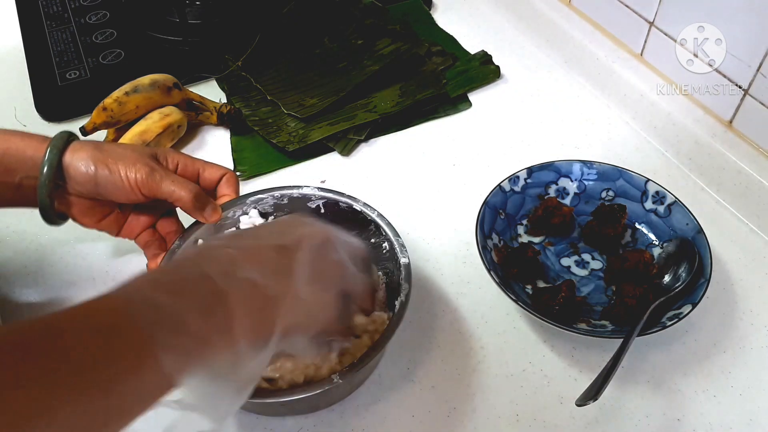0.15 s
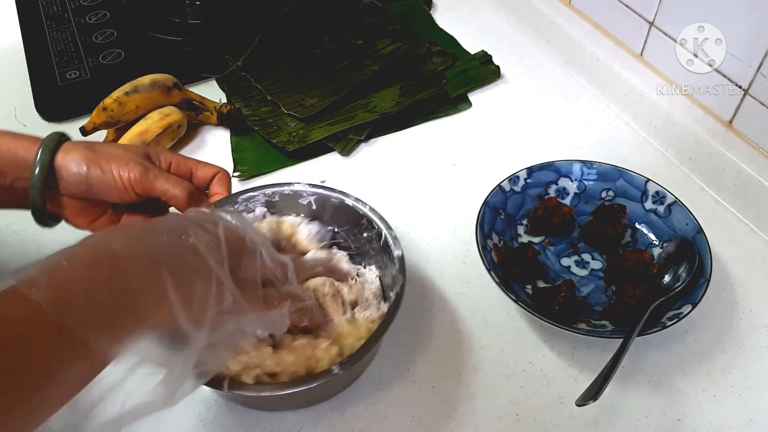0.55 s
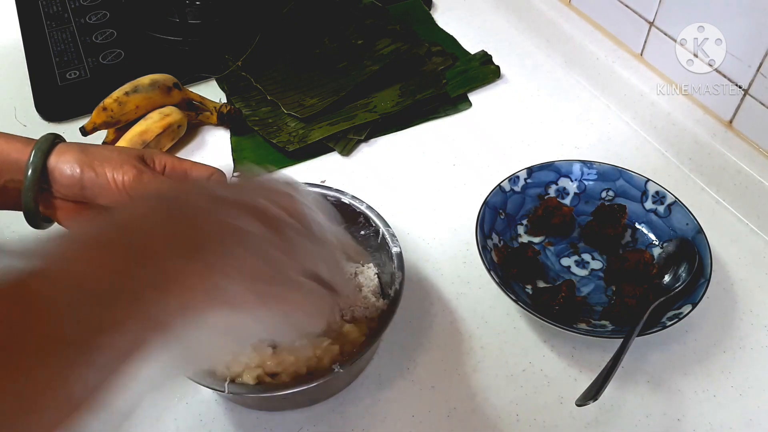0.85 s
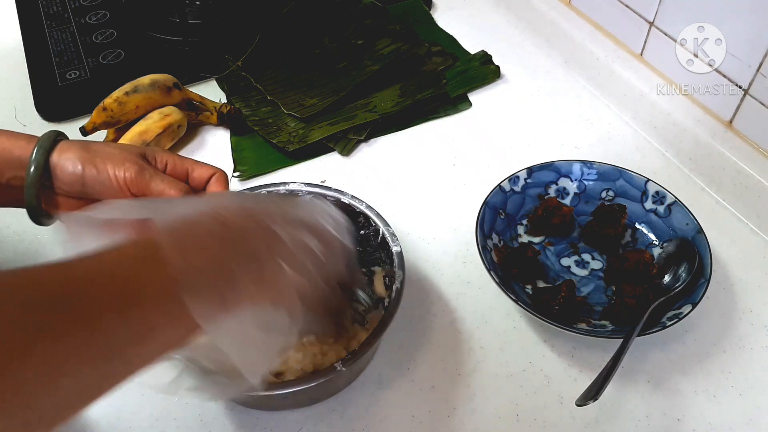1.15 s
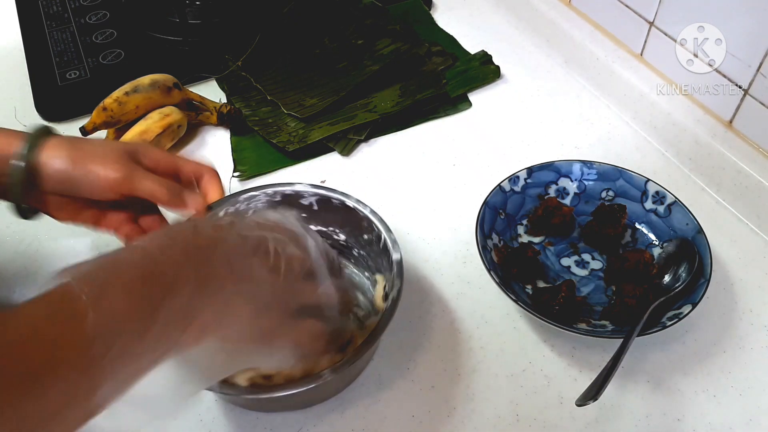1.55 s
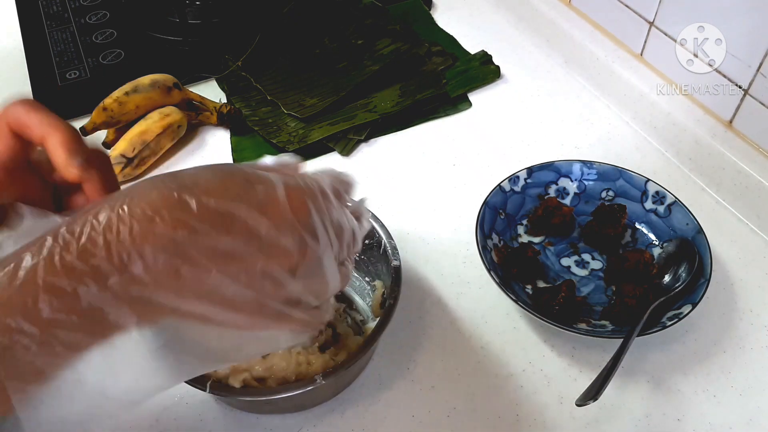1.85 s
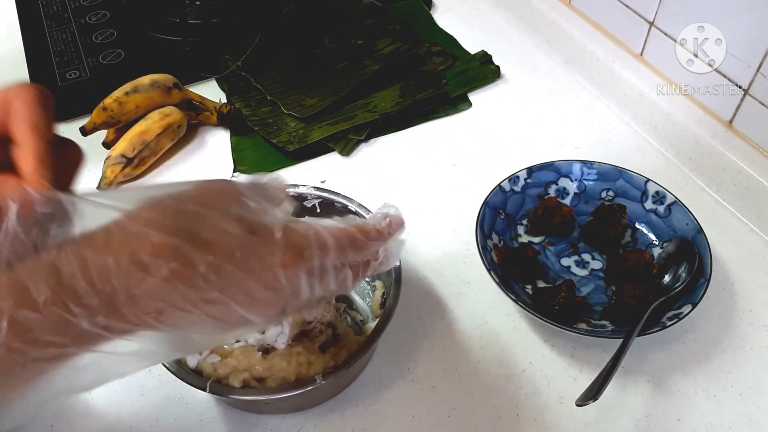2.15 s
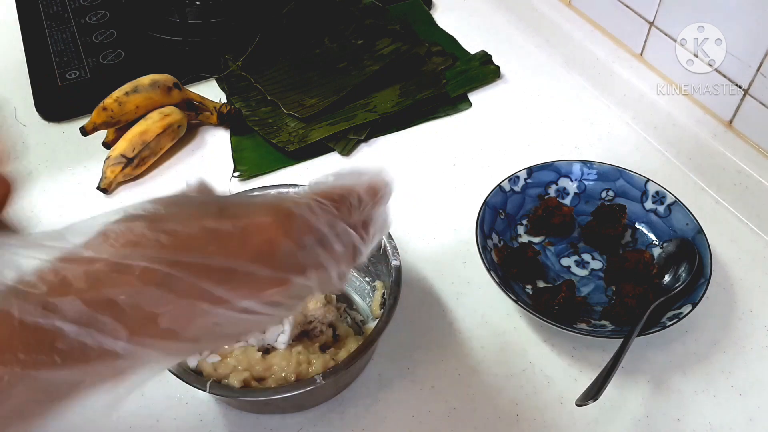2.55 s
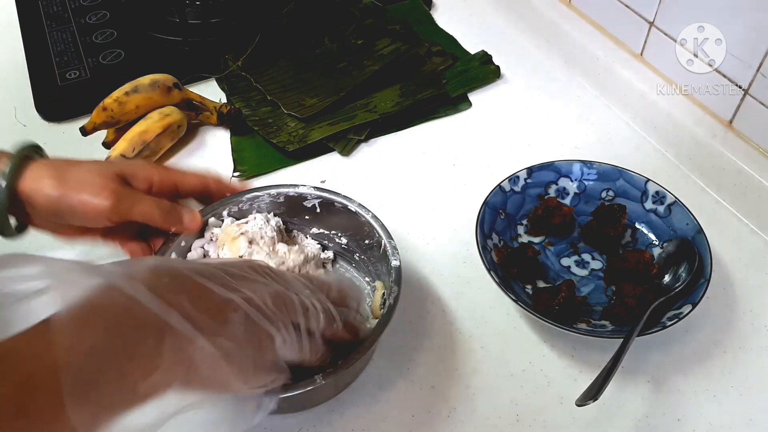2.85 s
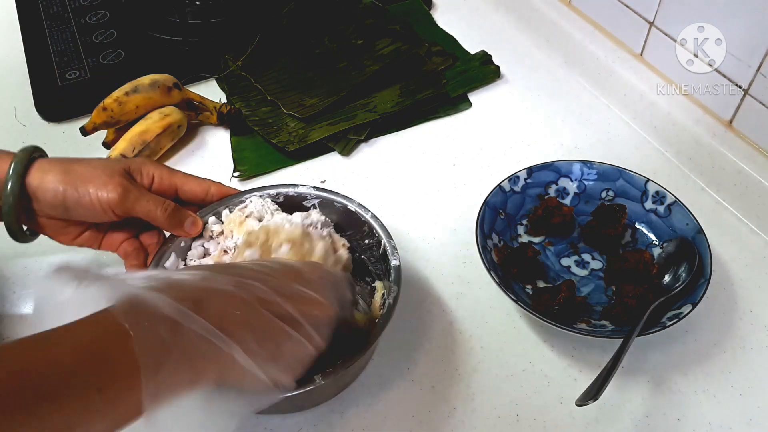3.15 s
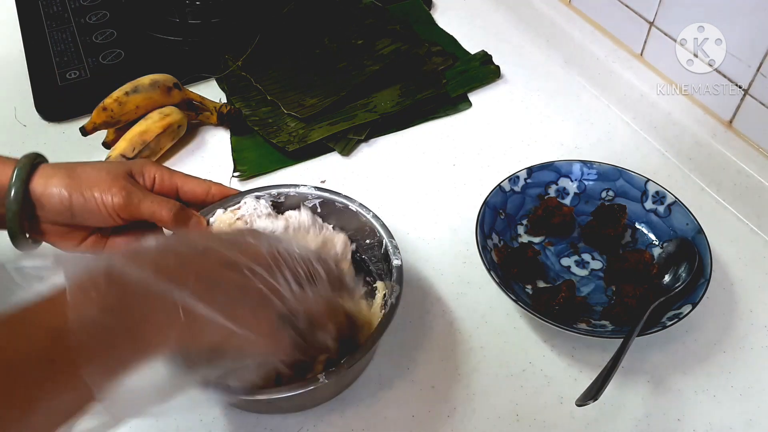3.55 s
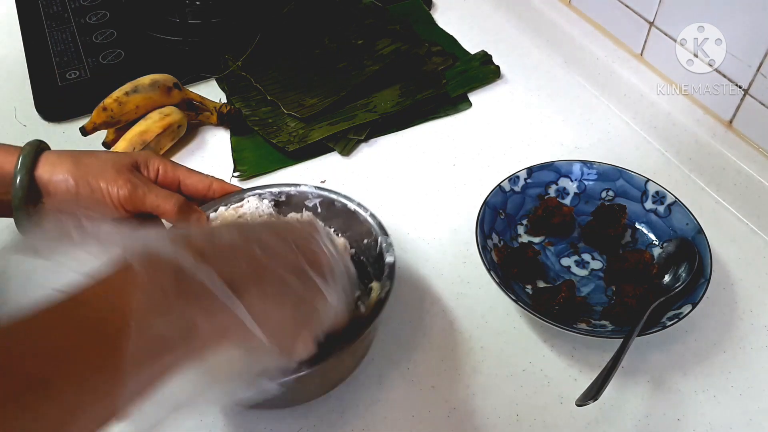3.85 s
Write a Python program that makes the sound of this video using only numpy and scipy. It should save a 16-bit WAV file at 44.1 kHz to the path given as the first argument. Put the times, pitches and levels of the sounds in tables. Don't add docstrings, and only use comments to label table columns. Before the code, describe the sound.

Gloved hand kneading soft wet food in a metal bowl, plastic crinkling, two loud late knocks

```python
import sys
import numpy as np
from scipy import signal
from scipy.fft import rfft, irfft
from scipy.io import wavfile

SR = 44100
rng = np.random.default_rng(int(sys.argv[2]) if len(sys.argv) > 2 else 0)


def generate_wav(sig):
    pcm = np.round(np.clip(np.atleast_2d(sig).T, -1, 1) * 32767).astype(np.int16)
    wavfile.write(sys.argv[1], SR, pcm)


def ratio_of_db(decibels):
    return 10 ** (np.asarray(decibels, float) / 20)


N = 176400
BASS_PAN_DB, RUSTLE_PAN_DB = -4.5, -1.4


def rms_one(x):
    return x / np.sqrt(np.mean(x ** 2) + 1e-20)


def colour(x, points):
    hz, db = np.transpose(points)
    f = np.maximum(np.arange(N // 2 + 1) * SR / N, 1)
    gain = ratio_of_db(np.interp(np.log(f), np.log(hz), db, left=-60))
    return rms_one(irfft(rfft(x) * gain, N))


def drift(rate_hz):
    step = 40
    r = np.exp(-2 * np.pi * rate_hz * step / SR)
    noise = rng.standard_normal(N // step + 2002)
    slow = signal.lfilter([1], [1, -2 * r, r * r], noise)[2000:]
    return np.interp(np.arange(N) / step, np.arange(len(slow)), rms_one(slow))


def grains(per_s, spread_db):
    sizes = ratio_of_db(spread_db * np.minimum(rng.exponential(1, (2, N)), 5))
    signs = rng.choice([-1, 1], (2, N))
    return sizes * signs * (rng.random((2, N)) < per_s / SR)


def ring(clicks, hz, t60_s):
    r, w = ratio_of_db(-60 / (t60_s * SR)), 2 * np.pi * hz / SR
    return signal.lfilter([0, np.sin(w)], [1, -2 * r * np.cos(w), r * r], clicks + 1e-18)


def strikes(times_s, gains):
    out = np.zeros(np.shape(gains)[:-1] + (N,))
    out[..., (np.asarray(times_s) * SR).astype(int)] = gains
    return out


def pan(x, db):
    left, right = x * ratio_of_db([[db / 2], [-db / 2]]) * np.ones((2, 1))
    return np.array([left, np.roll(right, 6)])


# frequency_hz [Hz], level_db [dB per Hz]
AIR_SPECTRUM = [(20, 4), (70, -20), (110, -6.5), (150, -9.5), (250, -21.5), (450, -21), (1000, -10.5),
                (3000, -74)]


def air():
    level_db = -48
    mid, side = rng.standard_normal((2, N))
    return pan(ratio_of_db(level_db) * colour(mid + 0.13 * side * [[1], [-1]], AIR_SPECTRUM), BASS_PAN_DB)


def low_pass(x, hz):
    return signal.lfilter(*signal.butter(1, hz, fs=SR), x)


def kitchen(x):
    first_echo_s, alike_below_hz, wall_cut_hz = 0.0035, 520, 1100
    bass_t60_s, treble_t60_s = 0.47, 0.28
    t = np.arange(SR // 2) / SR
    echoes = rng.standard_normal((3, len(t))) * np.clip(t / first_echo_s - 1, 0, 1)
    own, shared = echoes[:2], echoes[2]
    echoes = own - low_pass(own, alike_below_hz) + low_pass(shared, alike_below_hz)
    dull = low_pass(echoes, wall_cut_hz)
    bright = echoes - dull
    reply = dull * ratio_of_db(-60 * t / bass_t60_s) + bright * ratio_of_db(-60 * t / treble_t60_s)
    return signal.fftconvolve(x, reply / 36, axes=1)[:, :N]


# start_s [s], peak_db [dB]
THUDS = [(0.069, -35), (0.278, -28), (0.394, -43), (0.499, -42), (0.61, -46), (0.764, -29.5), (0.95, -30),
         (1.048, -25.5), (1.075, -25), (1.354, -29), (1.58, -34), (1.979, -35), (2.14, -40), (2.222, -53),
         (2.897, -32), (3.049, -35.5), (3.499, -55), (3.638, -39), (3.759, -41)]
# frequency_hz [Hz], level_db [dB], t60_s [s]
SLAB = [(83.7, -8, 0.1), (91.6, -7, 0.22), (115.7, -1, 0.24), (128, -14, 0.28), (166, -12.5, 0.22),
        (210, 3, 0.082)]


def counter():
    shuffles_per_s, shuffle_db, push_ms = 59, -53.5, 6.5
    knock_pushes = [(start + 0.003, slab_db) for start, _, _, slab_db in KNOCKS]
    start_s, peak_db = np.transpose(list(THUDS) + knock_pushes)
    scatter_db = rng.normal(0, 2.5, (len(start_s), len(SLAB)))
    shuffles = np.vstack([grains(shuffles_per_s, 2.74) for _ in range(3)])
    shuffles = ratio_of_db(shuffle_db) * shuffles
    out = 0
    for k, (hz, level_db, t60_s) in enumerate(SLAB):
        pushes = strikes(start_s, ratio_of_db(peak_db - 5.5 + scatter_db[:, k])) + shuffles[k]
        out = out + ring(ratio_of_db(level_db) * pushes, hz, t60_s)
    band = signal.butter(2, [68, 1000 / push_ms], "band", fs=SR, output="sos")
    return pan(signal.sosfilt(band, out), BASS_PAN_DB)


# start_s [s], peak_db [dB], pitch_hz [Hz], slab_db [dB]
KNOCKS = [(.347, -28.0, 660, -37), (.392, -41, 850, -34), (0.544, -30.5, 960, -63),
          (0.756, -32, 622, -45.0), (.95, -32.5, 327, -46), (1.049, -31, 350, -47), (1.355, -29, 615, -55),
          (2.05, -33, 550, -55.0), (2.236, -24.5, 820, -37), (2.25, -35, 294, -43),
          (2.378, -28.0, 554, -61), (2.6, -36, 407, -57), (3.3312, -4, 904, -15.5), (3.9349, 0.5, 616, -8)]
# frequency_hz [Hz], level_db [dB], t60_s [s]
PANEL = [(310, -7.5, 0.044), (415, -3, 0.013), (488, -3, 0.043), (548, -5.5, 0.022), (657, -11.5, 0.045),
         (687, -0.5, 0.023), (930, -9, 0.035), (986, 2.5, 0.024), (1120, -3.5, .025), (1190, 4, 0.013),
         (1410, 1, 0.031), (1440, -0.5, 0.017), (2090, 0.5, 0.018), (2730, -7, 0.011)]


def knocks():
    panel_db, off_pitch_db_per_oct, mode_scatter_db = -5, 3, 3.5
    opposed_above_hz = 800
    contact_t60_s, bounce_s, bounce_db = 0.0091, 0.002, -1.5
    start_s, peak_db, pitch_hz, _ = np.transpose(KNOCKS)
    scatter_db = mode_scatter_db * np.tanh(rng.normal(0, 1, (len(start_s), 2, len(PANEL))))
    out = 0
    for k, (hz, level_db, t60_s) in enumerate(PANEL):
        ear_sign = (-1) ** k * np.array([[np.sign(opposed_above_hz - hz)], [1]])
        off_pitch_db = off_pitch_db_per_oct * abs(np.log2(hz / pitch_hz))
        mode_db = peak_db + level_db + panel_db - off_pitch_db + scatter_db[:, :, k].T
        out = out + ring(strikes(start_s, ear_sign * ratio_of_db(mode_db)), hz, t60_s)
    for start, peak, hz in zip(start_s, peak_db, pitch_hz):
        blow = strikes([start, start + bounce_s], ratio_of_db([peak, peak + bounce_db]))
        out = out - ring(blow, hz, contact_t60_s)
    band = signal.butter(2, [190, 3220], "band", fs=SR, output="sos")
    out = signal.sosfilt(band, out)
    return pan(out, -1.5), pan(out[1], -1.7)


# centre_s [s], spread_ms [ms], crinkle_db [dB]
SQUEEZES = [(-0.055, 27, -31.5), (0.059, 97, -30.5), (0.222, 21, -35.5), (0.41, 40, -31),
            (0.541, 34, -30.3), (0.739, 52, -28), (0.968, 150, -34.5), (1.035, 32, -32.5),
            (1.149, 23, -36.5), (1.335, 60, -31.5), (1.42, 19, -31), (1.615, 60.3, -29.5),
            (1.783, 44, -37.5), (1.887, 25, -36.5), (2.102, 114, -31.7), (2.244, 24, -24.5),
            (2.369, 45, -30.5), (2.471, 31, -33), (2.578, 32.4, -28), (2.704, 28, -45), (2.883, 67, -29.7),
            (3.063, 57.4, -30.5), (3.208, 18, -40), (3.285, 45, -37), (3.403, 42, -30), (3.559, 37, -33),
            (3.677, 38, -33.5), (3.786, 14, -41.5), (3.92, 57.5, -31.5)]


def effort_db():
    rest_db = -41.5
    t = np.arange(0, N, 40) / SR
    power = ratio_of_db(2 * rest_db)
    for centre_s, spread_ms, crinkle_db in SQUEEZES:
        bell = np.exp(-0.5 * ((t - centre_s) * 1000 / spread_ms) ** 2)
        power = power + ratio_of_db(2 * crinkle_db) * bell
    return np.interp(np.arange(N) / SR, t, 10 * np.log10(power))


# time_s [s], squelch_over_crinkle_db [dB]
SINK = [(0, -6), (.3, -3.5), (.55, -8), (1.2, -6), (1.6, -7.5), (1.85, -11), (2.2, -13), (2.65, -17),
        (2.85, -6), (3.2, -4.5), (3.4, -11), (3.65, -4.5), (4, -3.5)]
# frequency_hz [Hz], width_hz [Hz], share [ratio]
HOLLOW = [(570, 40, 0.22), (913, 27, 0.89), (1372, 270, 2.3), (1553, 140, 0.78), (1774, 70, 0.67),
          (1884, 77, 1.47), (2250, 130, 0.74), (2560, 420, 0.89)]
# frequency_hz [Hz], level_db [dB per Hz]
FOOD = [(200, -11), (450, -22), (540, -1), (1200, -5), (1420, 1.5), (2000, 1.5), (2900, 5), (5000, -5.5)]


def food(effort):
    pops_per_s, pop_spread_db = 2500, 4
    alike, follows_effort = 0.27, 0.77
    pops = grains(pops_per_s * ratio_of_db(3.0 * drift(15)), pop_spread_db)
    pops = pops * (1 - alike) + alike * pops.sum(axis=0)
    hollow = 0
    for hz, width_hz, share in HOLLOW:
        hollow = hollow + 0.5 * share * rms_one(ring(pops, hz, 1.67 / width_hz))
    pops = rms_one(pops) + hollow
    mean_db = effort.mean()
    sink_db = np.interp(np.arange(N) / SR, *np.transpose(SINK))
    level_db = follows_effort * (effort - mean_db) + mean_db + sink_db
    return pan(ratio_of_db(level_db) * colour(pops, FOOD), RUSTLE_PAN_DB)


# frequency_hz [Hz], level_db [dB per Hz]
GLOVE = [(250, -8), (900, -7), (2600, 0), (5500, -4), (8300, -6.5), (9600, -7.5), (12000, -2.5),
         (15500, -5.5)]


def glove(effort):
    creases_per_s, crease_spread_db = 9000, 2.5
    swing_db = effort - effort.mean()
    snaps = grains(creases_per_s * ratio_of_db(0.5 * swing_db + 2.5 * drift(25)), crease_spread_db)
    snaps = snaps / ratio_of_db(0.19 * swing_db)
    return pan(ratio_of_db(effort) * colour(snaps, GLOVE), RUSTLE_PAN_DB)


def scene():
    rustle_room_db, knock_room_db = -6.5, -0.5
    effort = effort_db()
    rustle = glove(effort) + food(effort)
    blows, blows_to_room = knocks()
    room = kitchen(ratio_of_db(rustle_room_db) * rustle + ratio_of_db(knock_room_db) * blows_to_room)
    return rustle + blows + counter() + air() + room


def band_limit(x):
    return signal.sosfilt(signal.butter(12, 16410, fs=SR, output="sos"), x)


def record(dry):
    peak_hz, peak_width_hz, peak_share = 7690, 1150, 1
    low_hz, top_hz, clip_top = 73.6, 15520, 2.4
    x = dry + peak_share * signal.lfilter(*signal.iirpeak(peak_hz, peak_hz / peak_width_hz, SR), dry)
    x = signal.sosfilt(signal.butter(2, low_hz, "high", fs=SR, output="sos"), x)
    x = signal.sosfilt(signal.ellip(12, 0.5, 70, top_hz, fs=SR, output="sos"), x)
    mix = np.clip(clip_top * np.tanh(x / clip_top), -1, 1)
    return band_limit(mix)


dry = scene()
out = record(dry)
generate_wav(out)
```